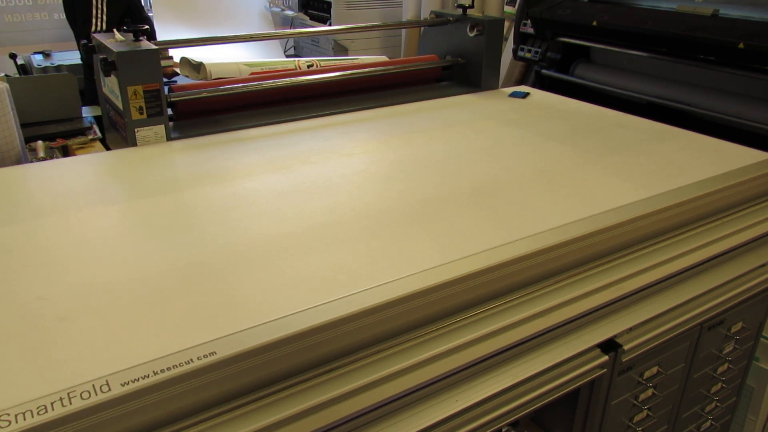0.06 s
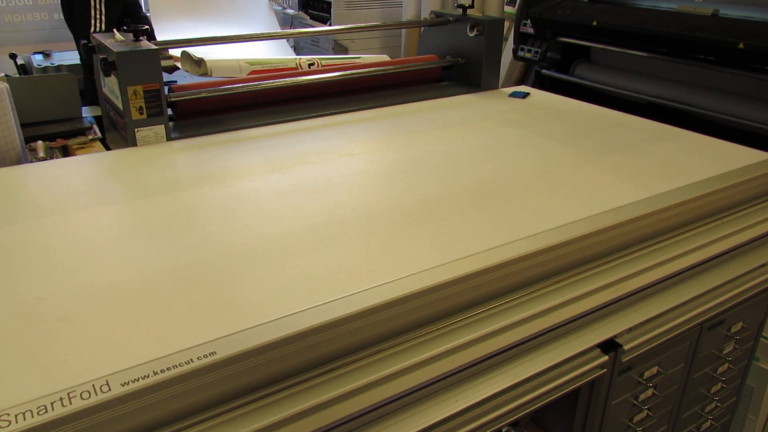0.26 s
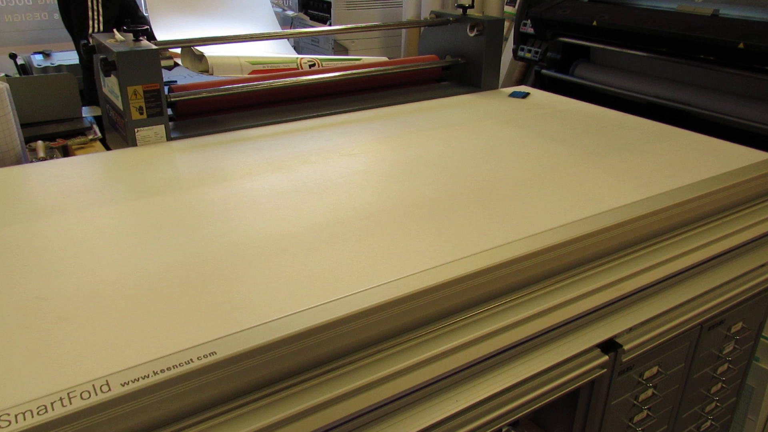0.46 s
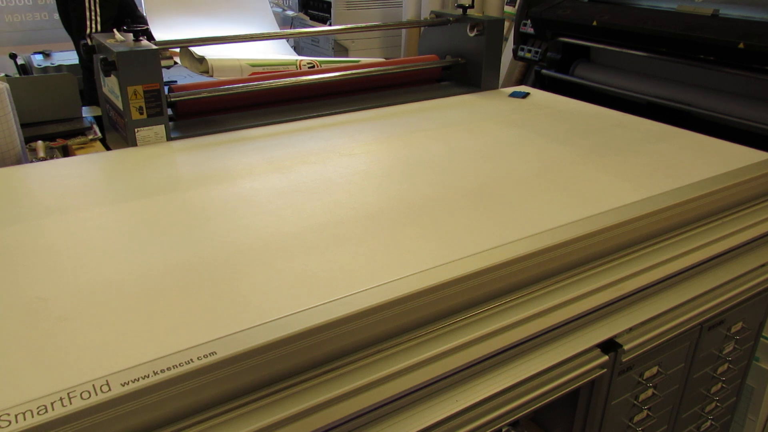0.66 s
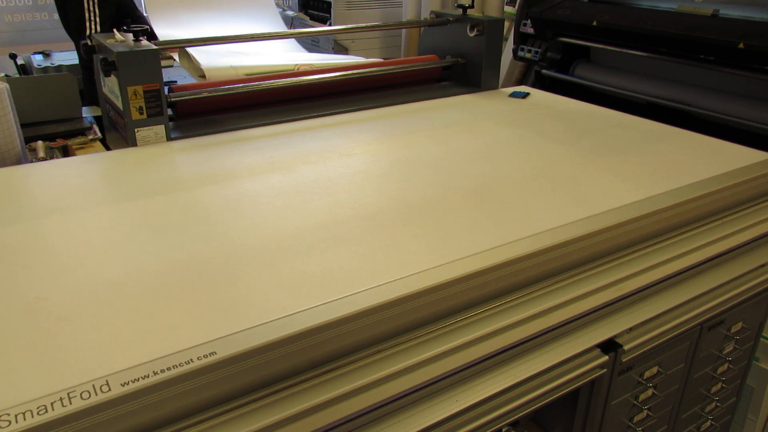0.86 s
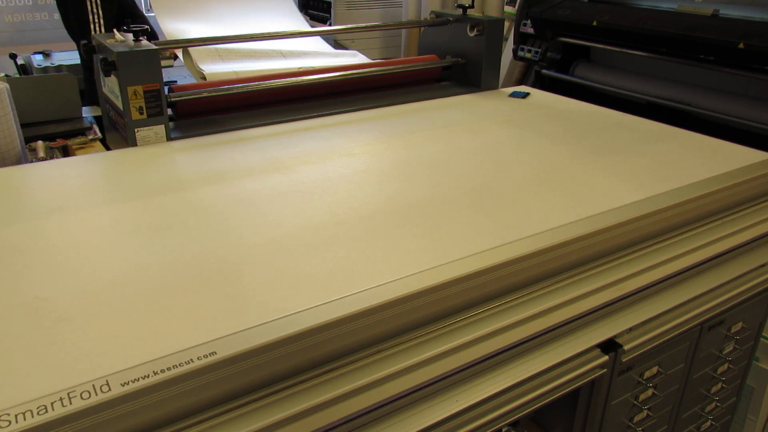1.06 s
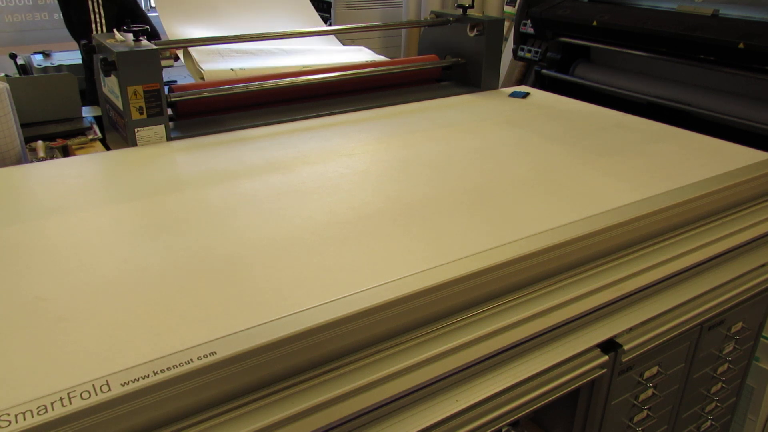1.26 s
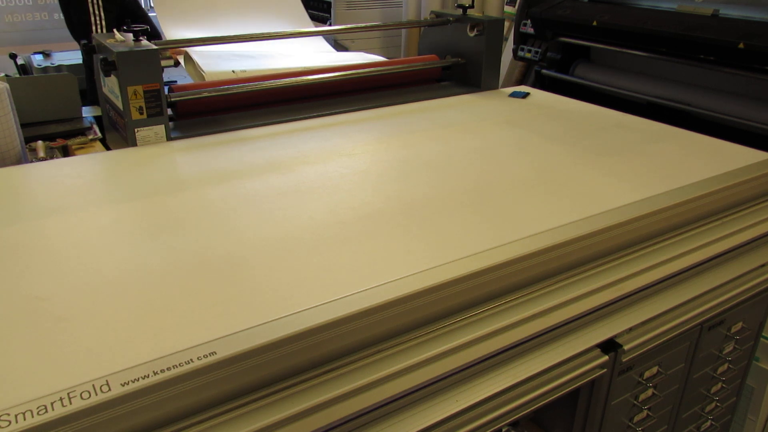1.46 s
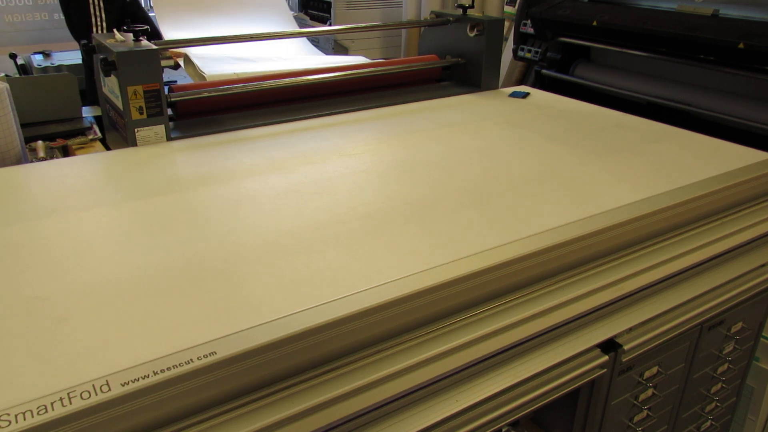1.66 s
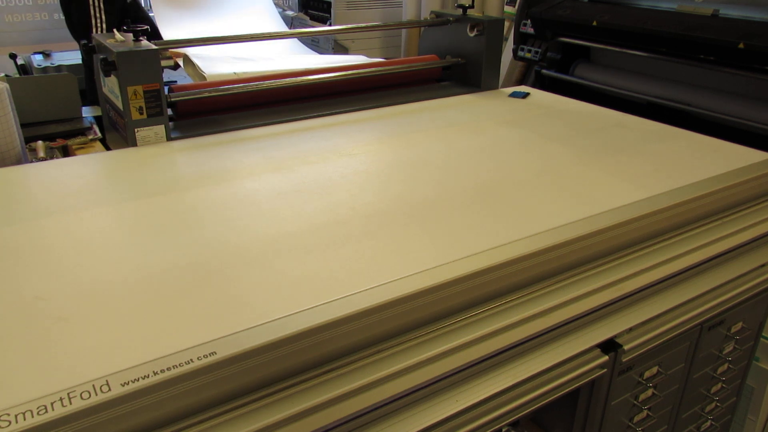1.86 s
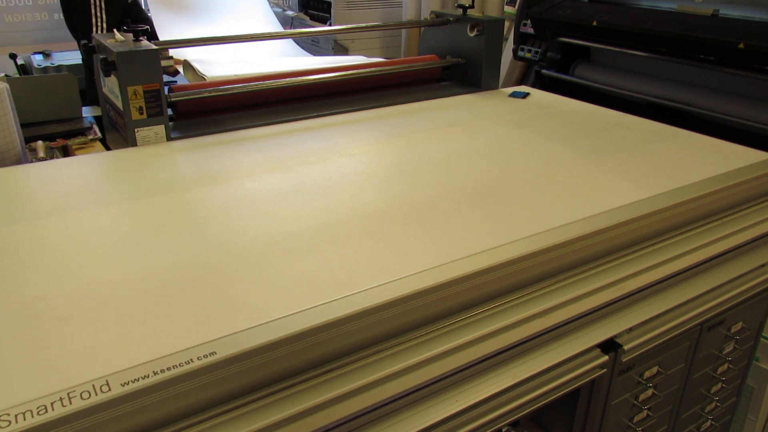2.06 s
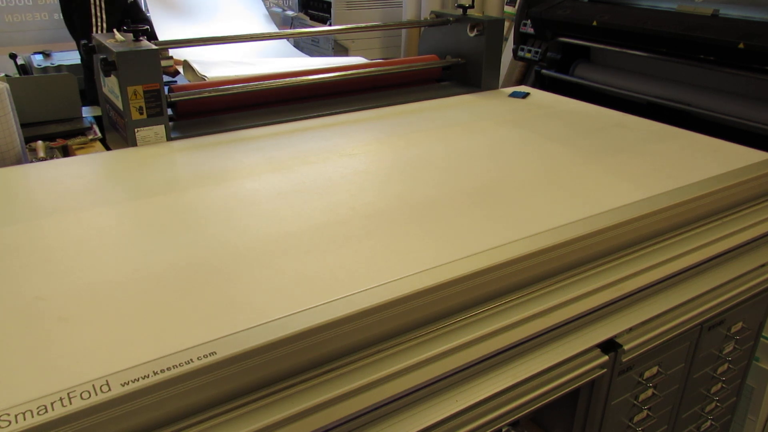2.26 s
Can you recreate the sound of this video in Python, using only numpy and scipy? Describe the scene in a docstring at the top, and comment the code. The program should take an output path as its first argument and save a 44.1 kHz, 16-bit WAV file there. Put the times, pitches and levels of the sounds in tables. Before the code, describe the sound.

Stiff sheet slaps twice, slides and snaps sharply over a steady low workshop machine hum

```python
"""Machines hum steadily in a workshop; across the room a stiff sheet slaps twice, slides, snaps and rustles,
and something soft thuds later. The machines are shaped noise plus a few unsteady motor and fan lines.
Handling is swarms of tiny contacts through the sheet's resonances, and the snaps are short noise cracks.
The room answers every handling sound and snap with a diffuse tail. The stereo pair hears the bass lean left."""
import sys
import numpy as np
from scipy import signal
from scipy.fft import rfft, irfft, next_fast_len
from scipy.io import wavfile
from scipy.ndimage import uniform_filter1d, map_coordinates

SR = 44100
rng = np.random.default_rng(int(sys.argv[2]) if len(sys.argv) > 2 else 0)


def unload_audio(sound):
    """Save the sound as a 16-bit wav file, at the path given as the first command line argument."""
    columns = np.transpose(np.atleast_2d(sound))
    # keep every value between -1 and 1, then stretch to whole-number steps
    steps = np.round(np.clip(columns, -1, 1) * 32767)
    wavfile.write(sys.argv[1], SR, steps.astype(np.int16))


N = 101430  # length in samples

# Motor and fan lines: (frequency [Hz], rms level [dB], level wander [dB], pitch drift [Hz])
MACHINE_LINES = [(48.5, -63.5, 3.5, .8), (97, -53, 2.5, .5), (245.5, -48, 1.8, .9), (493, -57, 1.5, 1),
                 (1565, -63.5, 1.2, 1)]
# Relative spectrum of the machines' noise: (frequency [Hz], density [dB per Hz])
MACHINE_NOISE = [(15, -48), (30, -33), (45, -29), (70, -21), (120, -17), (170, -9), (250, -7), (350, -8.5),
                 (520, -9.5), (700, -17), (1100, -22.5), (1600, -25), (1900, -30.5), (3000, -38),
                 (5000, -42.5), (9000, -42), (13000, -45), (15500, -57)]
# Stereo width of the machines: (frequency [Hz], side over mid [dB])
MACHINE_SIDE = [(60, 0), (180, -6.5), (550, -4.5), (1650, -7.5), (4970, -6), (15000, 1.5)]
MACHINE_NOISE_DB = -45  # rms of the mid, before the hollow at the microphones

# Frequencies at which the contact colours are read: (frequency [Hz])
COLOUR_HZ = [170, 300, 500, 1000, 1600, 2400, 4000, 6500, 10000, 14500]
# Slaps, slides and thuds; levels are before colour, sheet and room:
# (time [s], rise [s], fall t60 [s], level [dB], then ten colours [dB], one at each COLOUR_HZ)
CONTACTS = [(.222, 0.0094, 0.044, -28, 11, 9, 15, 2, 11, -5, 1.5, -5, -2.5, -8),
            (0.231, 0.0054, 0.046, -24.5, 7, 13.5, 1.5, 9, 8, 10, 5.5, 8, 1.5, -6),
            (.26, 0.025, 0.25, -34.5, 20.5, 1, 7, 0, 11, 8, -1, -16, -26, -26),
            (0.329, .08, 0.42, -46.5, 8, -2, 12, 7, -7, 4, 1.5, -2, -2, -13),
            (.40, 0.056, 0.34, -41.5, 21, 14, 11, 9, 12, 8, 1.5, -4, -22, -33),
            (.5165, 0.0021, .1, -31.5, 11, 15.5, -7, 10, 13, 12.5, 3, 8.5, 1, -16),
            (.522, 0.0094, 0.11, -30.5, -6.5, 3.5, 6.5, 8.5, 12.5, 9.5, 7.5, -1, -3, -11.5),
            (0.551, 0.033, 0.089, -37.5, -6, 0, -10, 10, 10, 10, -5, -2, -7, -16),
            (.63, 0.022, 0.07, -47.5, -9, 19, -16, -2, 15, -16, 7, 1, -17, -31),
            (.69, 0.19, 0.092, -45.5, 20, 6.5, 20.5, 10, 11, 11.5, 1.5, 0.5, -1, -8),
            (0.879, 0.025, 0.14, -35, 8, -4, -3, -13, -8, 4, -5.5, -3.5, -9, -19),
            (1.12, 0.12, 0.6, -52.5, 16, 19, 4.5, 8.5, 10.5, 3, -2.5, -1.5, -3.5, -12),
            (1.269, 0.058, 0.39, -50, 10, 4, 15, 18, 8, 6, 0.5, -4.5, -13, -18),
            (1.4, 0.14, 1, -62, 2, 1, 6, 15, 11, 3, -2, -6, -14, -12),
            (1.718, 0.042, 0.098, -50, 37, 3.5, 26.5, 14.5, 3.5, -7, -12, -25, -37, -23),
            (1.7051, 0.0032, .12, -43, 32, 22, 30, 14, 9.5, -2, -4, -8, -4.5, -14),
            (1.849, 0.01, .08, -53, 6, 39, 31.5, -3, -17, -13, -12, -25, -24, -18),
            (1.905, 0.021, 0.056, -47.5, -1, 32, 12, 12, -3, -1.5, -14, -13, -16, -20)]
GRAINS_PER_S, GRAIN_SPREAD_DB = 14000, 3.5
# Resonances of the sheet, a negative gain being a hollow: (frequency [Hz], width [Hz], gain [dB])
SHEET_MODES = [(1079, 100, 4.5), (1493, 67, 3.5), (1765, 23, 1.5), (1930, 24, -2.5), (1997, 80, 2),
               (2286, 41, 3.5), (2870, 42, -0.5), (4280, 120, 1), (6220, 730, 1.5)]

# Cracks of the sheet, direct peak before the low cut: (time [s], peak level [dB], t60 [s])
SNAPS = [(0.989, -15.5, 0.0065), (.9930, -13, 0.001), (1.0003, -19.5, 0.0082)]
# Relative spectrum of a crack: (frequency [Hz], density [dB per Hz])
SNAP_COLOUR = [(120, -14), (250, -5.5), (550, 4), (900, -1.5), (1500, -10), (2500, -8), (4000, -4.5),
               (6000, -9), (10000, -12.5), (15500, -28)]

# Late decay of the room: (frequency [Hz], t60 [s])
ROOM_T60 = [(150, 0.68), (500, 0.38), (1500, 0.83), (3500, 0.62), (7000, 0.54), (14000, 0.44)]
# Side gain of handling and snaps, direct and tail alike: (frequency [Hz], gain [dB])
ROOM_SIDE = [(150, -21), (700, -11), (1300, -11.5), (2400, -26), (4400, -15), (8000, -4.5), (15000, -2)]
BUILD_S = .008  # time constant of the tail's build-up
EARLY_T60, EARLY_DB = 0.17, -0.5  # the first reflections die sooner [s, dB]
DIRECT_SIDE_DB = -16  # the direct sound is narrower than its tail
PATCH_DB = 2  # uneven patches in the tail
CONTACT_WET_DB, SNAP_WET_DB = 3.5, 3  # gain of the tail
LOW_CUT_HZ = 160  # the handled things are too small to push air below this

# Lean between the channels: (frequency [Hz], left over right [dB])
LEAN = [(60, 3.5), (180, 4), (550, 3.0), (1650, 0), (4970, 0.0), (15000, -1)]
DIP_HZ, DIP_WIDTH_HZ, DIP_GAIN = 669.3, 270, 0.097  # a hollow in everything heard at this spot
TOP_HZ = 15300  # band limit


def amp(db):
    """Turn dB into linear gain."""
    return 10 ** (np.asarray(db) / 20)


def unit(x):
    """Scale a signal to an rms of 1."""
    return x / np.sqrt(np.mean(x ** 2) + 1e-20)


def along(points, hz):
    """Read (frequency, value) points on a log frequency axis."""
    f, v = np.transpose(points)
    return np.interp(np.log(hz + 1), np.log(f + 1), v)


def wobble(rate):
    """A smooth random curve through `rate` random knots a second."""
    knots = rng.standard_normal(int(N * rate / SR) + 4)
    return map_coordinates(knots, [np.arange(N) * rate / SR])


def filtered(x, response):
    """Multiply the spectrum of x by a response of frequency."""
    m = next_fast_len(x.shape[-1] + 8192)  # spare room at the end for ringing
    spectrum = rfft(x, m) * response(np.fft.rfftfreq(m, 1 / SR))
    return irfft(spectrum, m)[..., :x.shape[-1]]


def causal(points, size=1024):
    """Minimum-phase pulse with the colour of (Hz, dB) points, by folding the cepstrum."""
    level = amp(along(points, np.fft.rfftfreq(size, 1 / SR)))
    cepstrum = irfft(np.log(level), size)
    cepstrum[1:size // 2] *= 2
    cepstrum[size // 2 + 1:] = 0
    return irfft(np.exp(rfft(cepstrum)), size)


def add(out, start_s, x):
    """Mix x into out from start_s seconds, cut at the end."""
    part = out[:, round(start_s * SR):][:, :x.shape[1]]
    part += x[:, :part.shape[1]]


def machines():
    """Steady broad noise of the machines, with lines that drift in pitch and wander in level."""
    mid, side = filtered(rng.standard_normal((2, N)), lambda f: amp(along(MACHINE_NOISE, f)))
    side = filtered(side, lambda f: amp(along(MACHINE_SIDE, f)))
    level = amp(MACHINE_NOISE_DB + 0.52 * wobble(4.08))
    out = level * np.array([mid, side]) / mid.std()
    for hz, db, wander_db, drift_hz in MACHINE_LINES:
        cycles = np.cumsum(hz + drift_hz * wobble(7.41)) / SR
        phase = 2 * np.pi * (cycles + rng.random())
        level = np.sqrt(2) * amp(db + wander_db * wobble(7.07))
        line_side = amp(along(MACHINE_SIDE, hz)) * np.cos(phase + 1.03 * wobble(5.1))
        out += level * np.array([np.sin(phase), line_side])
    return out


def room(x, pulse, wet_db):
    """Mid and side of a coloured sound; its energy feeds a diffuse tail, each frequency dying at its own speed."""
    x = np.pad(x, (0, SR))
    hz, t, noise = signal.stft(rng.standard_normal((2, len(x))), SR, nperseg=128)
    late = amp(-60 * t / along(ROOM_T60, hz)[:, None])
    build = 1 - np.exp(-t / BUILD_S)
    early = 1 + amp(EARLY_DB - 60 * t / EARLY_T60)
    decay = (late * build * early) ** 2
    # energy of the dry sound in each frame, spread forward in time by the decay
    frame = np.arange(len(x)) * len(t) // len(x)
    energy = np.bincount(frame, x ** 2) * len(t) / len(x)
    power = signal.fftconvolve(decay / decay.sum(1).mean(), energy[None], axes=1)[:, :len(t)]
    patches = unit(uniform_filter1d(rng.standard_normal(power.shape), 12, 1))
    tail_frames = noise * amp(PATCH_DB * patches) * np.sqrt(abs(power))
    tail = signal.istft(tail_frames, SR, nperseg=128)[1][:, :len(x)]
    direct = x * amp([[0], [DIRECT_SIDE_DB]])
    mid, side = signal.fftconvolve(amp(wet_db) * tail + direct, pulse[None], axes=1)
    return np.array([mid, filtered(side, lambda f: amp(along(ROOM_SIDE, f)))])


def snaps():
    """Three cracks close together, each a decaying scrap of coloured noise answered by the room."""
    out, pulse, t = np.zeros((2, N)), causal(SNAP_COLOUR), np.arange(512) / SR
    for start_s, peak_db, t60 in SNAPS:
        crack = rng.standard_normal(len(t)) * amp(-60 * t / t60)
        peak = abs(np.convolve(crack, pulse)).max()
        add(out, start_s, room(amp(peak_db) * crack / peak, pulse, SNAP_WET_DB))
    return out


def sheet_resonance(f):
    """Response of the sheet: its resonant peaks and hollows in series."""
    response = 1
    for centre, width, db in SHEET_MODES:
        band = 1j * f * width / (centre ** 2 - f * f + 1j * f * width)
        response = response * (1 + (amp(db) - 1) * band)
    return response


def handling():
    """Each slap, slide or thud is a swarm of tiny contacts that swells, then dies."""
    out, t = np.zeros((2, N)), np.arange(SR // 2) / SR
    for start_s, rise, t60, db, *colour in CONTACTS:
        hit = rng.random(len(t)) < GRAINS_PER_S / SR
        strength = amp(GRAIN_SPREAD_DB * rng.exponential(size=len(t)))
        grains = hit * rng.standard_normal(len(t)) * strength
        swell = np.clip(t / rise, 0, 1) ** 2
        fall = amp(-60 * np.clip(t - rise, 0, None) / t60)
        pulse = causal(list(zip(COLOUR_HZ, colour)))
        add(out, start_s, room(amp(db) * unit(grains) * swell * fall, pulse, CONTACT_WET_DB))
    return filtered(out, sheet_resonance)


def low_cut(f):
    """Small things push little air: a fourth-order low cut."""
    return (-f * f / (LOW_CUT_HZ ** 2 - f * f + 1j * f * LOW_CUT_HZ)) ** 2


def hollow(f):
    """The notch heard at the microphones' spot."""
    away = DIP_HZ ** 2 - f * f
    damping = 1j * f * DIP_WIDTH_HZ
    return (away + damping * DIP_GAIN) / (away + damping)


def scene():
    """Machines, handling and snaps at the stereo pair, leaning left in the bass."""
    sheet = filtered(handling() + snaps(), low_cut)
    mid, side = filtered(machines() + sheet, hollow)
    left_right = np.array([mid + side, mid - side])
    return filtered(left_right, lambda f: amp(np.outer([.5, -.5], along(LEAN, f))))


def record(dry):
    """Nothing is kept above the band limit."""
    return filtered(dry, lambda hz: hz < TOP_HZ)


dry = scene()
out = record(dry)
unload_audio(out)
```